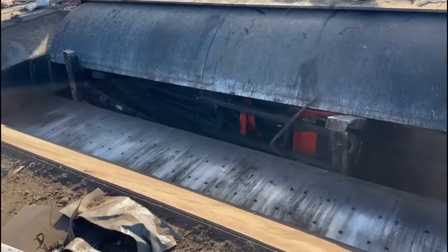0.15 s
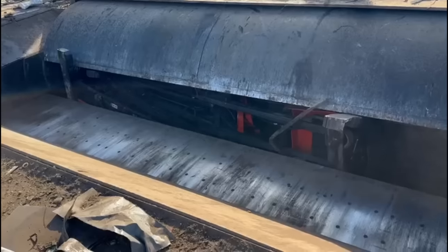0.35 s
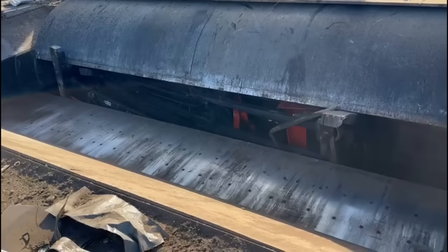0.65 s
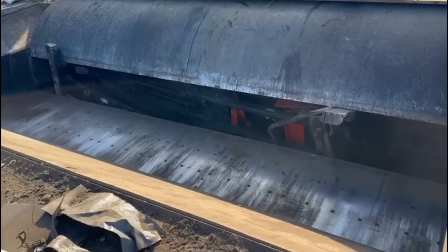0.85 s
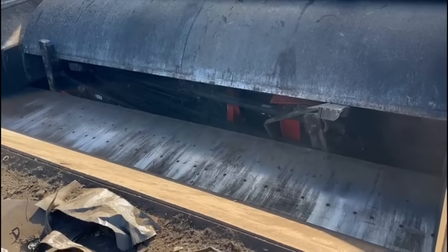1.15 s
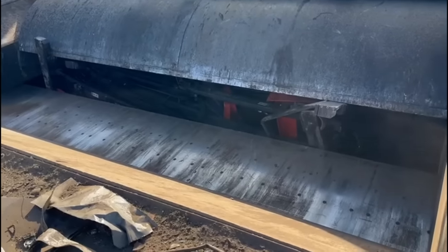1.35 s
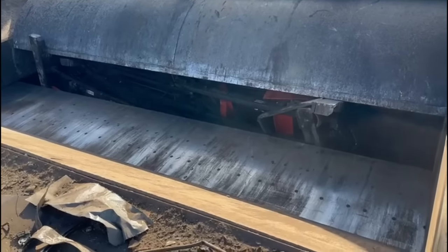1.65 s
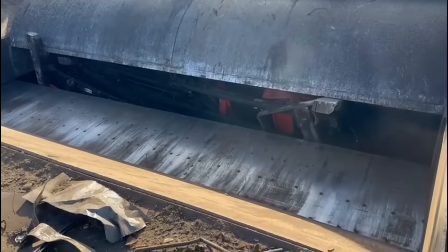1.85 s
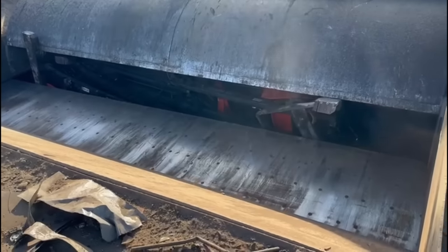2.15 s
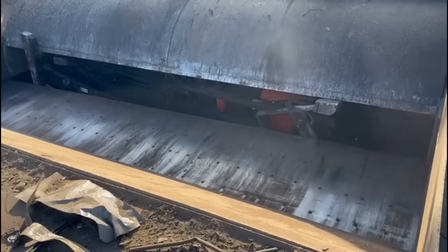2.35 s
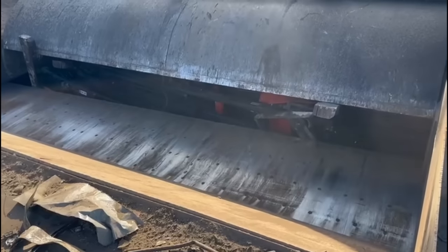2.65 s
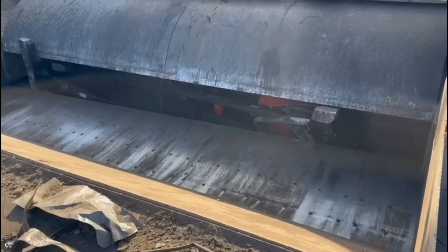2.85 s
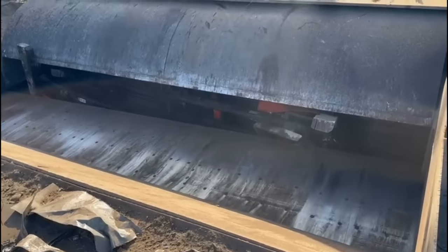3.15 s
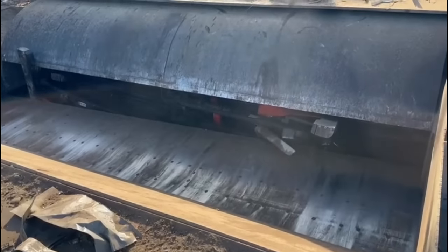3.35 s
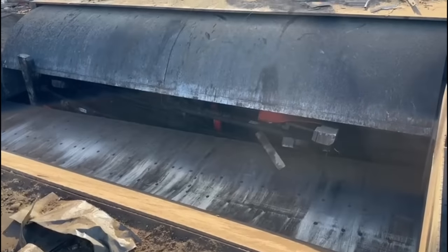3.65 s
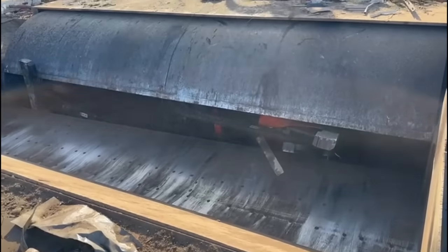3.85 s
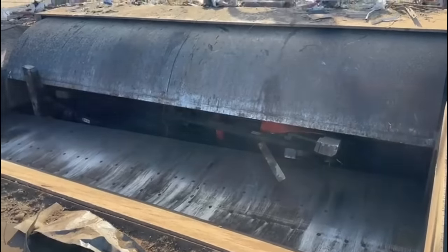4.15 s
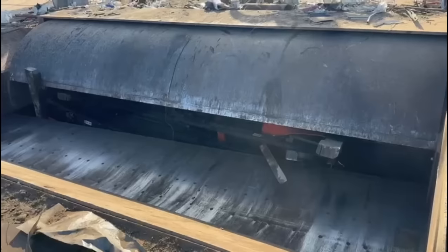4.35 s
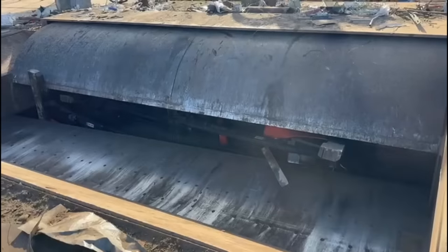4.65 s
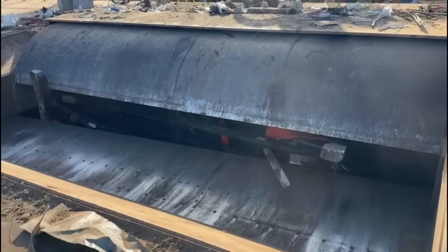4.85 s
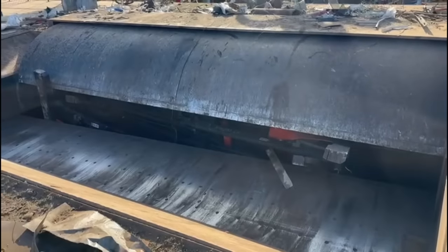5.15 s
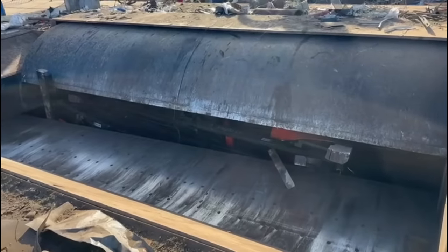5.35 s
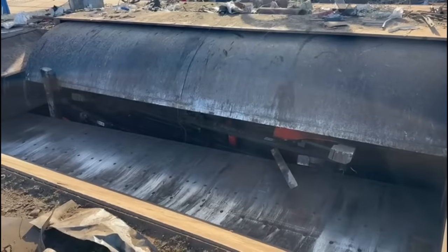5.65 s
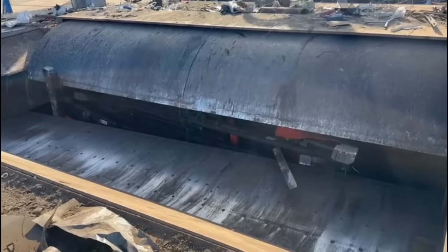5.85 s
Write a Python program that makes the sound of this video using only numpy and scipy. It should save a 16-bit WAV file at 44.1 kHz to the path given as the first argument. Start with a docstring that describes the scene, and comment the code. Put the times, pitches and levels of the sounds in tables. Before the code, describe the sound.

Close stereo capture of a steel lid folding onto a machine: gritty metal grinding with hard cracks and hollow panel booms for a second, a gap, a big buckle with wavering squeal, then a run of crackling snaps. A throbbing diesel pump remains behind, with a single clank and weak creaks before crushing resumes.

```python
"""Scrapyard, outdoors: a hydraulic baler folds its steel lid down on a forklift, before a two-port microphone.
The wreck grinds in bursts of tiny slips ringing through steel noise; parts snap as cracks with a noisy tail.
Panels buckle in short sagging swings; struck steel clanks and fragments ping as decaying modes.
Steel squeals on the press wall in bending tones; as the lid eases off, filtered slips creak.
Behind the wreck a diesel pump drones: steady tones over throbbing low noise."""
import sys
import numpy as np
from scipy import signal
from scipy.fft import rfft, irfft, next_fast_len
from scipy.io import wavfile
from scipy.ndimage import uniform_filter1d

SR = 44100
rng = np.random.default_rng(int(sys.argv[2]) if len(sys.argv) > 2 else 0)


def store_pcm(level_fs):
    """Save levels as 16-bit WAV."""
    pcm = np.round(np.clip(level_fs, -1, 1) * 32767).astype(np.int16)
    wavfile.write(sys.argv[1], SR, np.atleast_2d(pcm).T)


N = 264159
TIME = np.arange(N) / SR
SIZE = next_fast_len(N)
FREQS = np.maximum(np.arange(SIZE // 2 + 1) * SR / SIZE, 1)

# five registers of the wreck: frame, panels, brackets, tearing sheet, grit: low f/Hz, high f/Hz
REGISTERS = [(42, 130), (130, 600), (600, 1800), (1800, 4200), (4200, 12500)]
# decay of each register's ring: T60/s
RING_T60_S = [0.35, 0.43, 0.3, 0.22, 0.21]
# colour of the crushed steel: f/Hz, relative level per Hz/dB
STEEL_COLOUR = [(25, -41), (45, -14.5), (100, -0.5), (250, 1.5), (540, 1.5), (1080, -6), (1650, -7.5),
                (2400, -10.5), (4200, -23.5), (6200, -29), (8000, -24.5), (9800, -23.5), (10700, -38),
                (12000, -72.5)]
# resonances of the press chamber: f/Hz, width/Hz, lift/dB
CHAMBER = [(246, 77, 1.5), (466, 6, -1), (632, 55, -0.5), (640, 63, 1), (1314, 35, 4), (1690, 23, 4),
           (1800, 40, -0.5), (2370, 60, -2), (2870, 59, -1.5), (3540, 47, 3)]

# force of the lid, one curve a push: t/s, effort level/dB, brightness/dB per register
PUSHES = [
    [(0.0, -19, 1), (0.2, -28.5, -0.5), (0.33, -26.5, 1), (0.42, -23.5, -1), (0.57, -19, -0.5),
     (0.64, -18, -1.5), (0.68, -21, 1), (0.73, -17, -1), (0.83, -28, -3), (0.95, -25, 0), (1.09, -27, 0.7),
     (1.18, -43.5, -1), (1.5, -58.5, 2)],
    [(1.53, -43, 0), (1.56, -29.5, 1.5), (1.71, -24, -2), (1.88, -21.5, -0.5), (1.96, -23.5, -0.5),
     (2.17, -24.5, 1.7), (2.42, -30, -0.5), (2.62, -29.5, 0.3), (2.71, -21, -2.5), (2.83, -30, 1.6),
     (3.1, -24, 2), (3.4, -23.5, 0.5), (3.57, -23.5, 0.3), (3.68, -25, 1.3), (3.78, -47, -4.5),
     (3.95, -60, -4.5)],
    [(5.12, -68, -2), (5.29, -60, -3), (5.366, -53, -4.5), (5.48, -60, -4.5), (5.68, -65, -5)],
    [(5.74, -31, 1), (5.81, -21.5, -1.5), (5.89, -30.5, 1.5), (5.93, -28.5, 3.5), (5.99, -33, 0)],
]
# panels, brackets, sheet, grit at the usual effort: relative level/dB
GRIND_DB = [-0.5, -3, -6.5, -10.5]
# the same four, their rise with effort (a weak push is dull): slope/dB per dB
EFFORT_SLOPES = [0.849, 1.001, 1.17, 1.42]
# groan of the heavy frame while it still resists: t/s, level/dB
FRAME_GROAN = [(0.0, -27.5), (0.4, -31), (0.7, -26), (0.83, -34), (0.95, -28), (1.02, -35.5), (1.58, -45),
               (1.7, -33.5), (2.55, -39.5), (2.9, -35.5), (3.25, -41), (3.6, -39), (4.1, -58),
               (5.15, -65.5), (5.38, -42.5), (5.65, -50.5), (5.82, -33.5), (5.99, -47)]
# less crunch while the steel slides, panels to grit: reduction/dB
SLIDE_RELIEF_DB = [0.3, 1.3, 3.8, 2.5]
USUAL_EFFORT_DB = -22
STICK_DB, STICK_S = 2, 0.086   # depth and time constant of the jam before a part gives way
SLIDE_S, SLIDE_HALF_S = 2.06, .2   # middle and half length of the slide

# parts that snap: t/s, level/dB before the mix, brightness/dB per register, rise/s
SNAPS = [(0.054, -25.5, 1.5, .002), (0.117, -12.5, -2, 0.0029), (0.2333, -15.5, 2, .0003),
         (0.35, -18, -1, 0.00096), (0.380, -15.5, -2.5, 0.0015), (0.424, -23, -5, 0.0023),
         (0.494, -13.5, 0.5, .003), (0.530, -21, 1.5, .003), (0.569, -19, 0, .002), (0.588, -17, 0, 0.0032),
         (0.609, -16, 0.5, 0.0034), (0.646, -21, -2, .003), (0.689, -13.5, 3, 0.00091),
         (0.860, -32, 0, .001), (0.906, -19.5, 2, 0.0069), (0.971, -29.5, -0.5, 0.0016),
         (1.036, -28.5, -1, .002), (1.537, -30.5, -0.5, 0.0011), (1.559, -25, 2, 0.00082),
         (1.611, -30, 4, 0.0017), (1.805, -18.5, -4, 0.0037), (1.858, -22, 2, 0.0034),
         (2.322, -31, 1.5, 0.0017), (2.452, -31.5, 5, 0.0018), (2.498, -30.5, -1.5, .001),
         (2.579, -26.5, -0.8, .0005), (2.618, -31, 1.5, .001), (2.672, -21, 5, 0.004),
         (2.798, -27.5, 1.5, 0.0012), (2.884, -18.5, 0, 0.0011), (2.952, -28.5, 2, .001),
         (3.000, -19, 2.5, .003), (3.061, -19.5, 2.5, 0.0015), (3.082, -22, 1.5, .001),
         (3.113, -20, -0.5, 0.0008), (3.154, -24.5, 2.5, .001), (3.195, -24, 3, .001),
         (3.223, -23.5, 2.5, .001), (3.274, -19.5, 2, 0.0017), (3.318, -23, 2, .001),
         (3.376, -25.5, 1, 0.0009), (3.431, -14, 0.5, .002), (3.464, -20.5, -1, .001),
         (3.541, -19.5, 3, 0.0014), (3.602, -26.5, 2, .001), (3.622, -22.5, 4, 0.0022),
         (3.664, -28.5, 3, .002), (4.085, -55, 0.5, 0.0043), (4.3768, -17, 0, 0.0012),
         (4.863, -51, -1.5, .008), (5.030, -70, 10, .001), (5.352, -62, 6, .006),
         (5.73, -32.5, -0.5, 0.004), (5.8, -23.5, 2, 0.0017), (5.822, -23, -4, 0.0019),
         (5.924, -26, -1, 0.0017)]
# share of a snap, by register: relative level/dB
SNAP_SHARE_DB = [-19, -3, -.5, -2.5, -8.5]
# hard front of a snap, by register: relative level/dB
CRACK_DB = [-12, -12, -9, -4.5, -9]

# panels that buckle: t/s at the crest, peak level/dB before the mix, f/Hz at the crest
BUCKLES = [(0.041, -12, 247), (0.19, -20, 99), (0.320, -17.5, 91.5), (0.384, -9.5, 345),
           (0.394, -12.5, 88.5), (0.432, -6.5, 225), (0.636, -10.5, 111), (0.722, -10, 215),
           (0.727, -14, 123), (0.930, -14, 255), (1.812, -3, 430), (1.844, -9.5, 332), (1.862, -6, 295),
           (2.015, -10, 244), (2.661, -18.5, 131), (2.721, -8.5, 203), (3.095, -6, 740), (3.099, -7, 250),
           (3.450, -9, 289), (3.828, -19.5, 206), (3.868, -26, 207), (5.800, -15, 630), (5.806, 0.5, 780)]
BUCKLE_CYCLES = 2.2   # swings from the crest down to 1/e

# heavy parts knocking on the press wall: t/s, level/dB, f/Hz around which the blow rings most
CLANKS = [(0.122, -16.5, 1050), (0.376, -22, 1000), (0.2335, -14, 2950), (0.499, -13, 1500),
          (0.556, -19.5, 1400), (0.622, -17.5, 1200), (0.691, -24, 2100), (2.677, -20.5, 980),
          (2.799, -29, 2400), (2.886, -23, 840), (3.062, -22.5, 2500), (3.276, -26, 2700),
          (3.434, -18.5, 1350), (3.543, -24.5, 1400), (4.378, -20, 2200), (4.384, -24, 800),
          (5.804, -22.5, 1560), (5.926, -33, 2500)]
# modes of the knocked steel, before each blow's detuning: f/Hz, relative level/dB, T60/s
CLANK_MODES = [(530, -5, 0.15), (608, -1.5, .14), (735, -3, .11), (868, -4.5, 0.079), (1216, -7, 0.17),
               (1303, -4.5, .18), (1532, -3.5, 0.14), (1635, -1.5, 0.14), (1666, -5, 0.16),
               (1988, -5.5, .16), (2100, -6.5, 0.13), (2310, -6.5, .2), (2434, -5, 0.13), (2530, -9, .13),
               (2800, -5.5, 0.11), (3450, -11.5, 0.17), (3760, -13.5, .1), (4150, -13, 0.049),
               (4920, -12, .06), (5540, -14, .06)]
CLANK_OCTAVES = 1.1   # how far from its centre a blow still wakes the modes

# modes of a small fragment, before its own detuning: multiple of its pitch, relative level/dB
FRAGMENT_MODES = [(1, 0), (1.58, -4.5), (2.35, -7)]

# tones friction locks on to: f/Hz, relative level/dB, t/s at mid-grip, half length/s
SQUEALS = [(892, -32, 2.08, .19), (1310, -24, 1.88, 0.032), (1310, -33.5, 2.12, .18),
           (1450, -37, 2.2, 0.064), (1670, -24, 1.89, .057), (1684, -32.5, 2.05, 0.12),
           (1840, -27.5, 1.958, .1), (1880, -32, 2.16, 0.1), (2316, -31, 2.09, .13),
           (2400, -29.5, 1.885, .05), (2400, -36, 2.225, 0.042), (2530, -40.5, 2.15, 0.09),
           (2670, -39.5, 2.06, .19), (2805, -28.5, 1.9, 0.037), (2850, -40, 1.9, .06),
           (3070, -36.5, 2.125, .04), (3160, -43, 2.13, .14), (3242, -33, 1.9, .045),
           (3372, -40, 1.88, .05), (3768, -37.5, 1.89, .045), (3750, -47, 2.13, .14),
           (3995, -42, 1.89, .04), (4050, -39.5, 1.91, 0.046), (4040, -45.5, 2.07, 0.082),
           (4735, -45, 1.99, .07), (4878, -47.5, 1.89, .05), (5610, -51.5, 2.07, .19),
           (6000, -47.5, 1.99, 0.068), (6490, -55, 2.07, .19), (6745, -49.5, 2.08, .19),
           (7130, -53.5, 2.08, .1), (7505, -52.5, 2.0, .14)]
# squeal pitch following the contact pressure: t/s, bend/percent
SQUEAL_BEND = [(1.86, .4), (1.96, -0.44), (2.03, -0.22), (2.12, 0.1), (2.27, 1.43)]

# creaks as the lid eases off: t/s at the crest, level/dB, half length/s, f/Hz
CREAKS = [(4.89, -53, 0.032, 600), (5.207, -59, .03, 686), (5.255, -58.5, 0.041, 790),
          (5.345, -51, 0.05, 506), (5.39, -53.5, 0.06, 670), (5.47, -58, 0.07, 490),
          (5.59, -60, 0.045, 660)]

# colour of the pump's rumble, its tilt quartered for the walls' answer: f/Hz, relative level per Hz/dB
RUMBLE_COLOUR = [(25, -33), (45, 0), (86, 5), (160, 1), (250, -6.5), (450, -12), (600, -16), (2170, -25.5),
                 (3200, -34.5), (7000, -44), (9600, -35), (11500, -64.5)]
# tones of the diesel pump: f/Hz, rms level/dB around which they surge
PUMP_TONES = [(75.4, -63), (220.7, -58), (333.8, -66.5), (446.8, -67), (479.1, -69.5), (667.5, -71),
              (888.2, -74), (1093, -78), (1556, -76)]
RUMBLE_DB = -48   # level around which the rumble surges

# the two microphone ports: f/Hz, likeness of the two sides (0 to 1), phase/rad by which left leads
MIC_PORTS = [(150, .995, 0), (400, .982, .01), (850, .78, .1), (1450, .76, .65), (2300, .94, 0),
             (3200, .82, -.2), (4300, .93, -.05), (5300, .8, -.2), (6100, .9, -.05), (7100, .65, -1.5),
             (7800, .9, -3), (8600, .9, -2.9), (9400, .68, -1.2), (10400, .98, -.05)]
CUTOFF_HZ = 11400


def grinding(registers, levels, count=5):
    """Slips at several contact spots shake all registers at once; the push sets how loud each one is."""
    forces = [slips(per_s=210, spread_db=4.5, clump_db=4.5) for spot in range(count)]
    out = 0
    for modes, level, t60 in zip(registers, levels, RING_T60_S):
        crunch = sum(ring_out(force, modes, t60, direct_db=-3, direct_s=0.019) for force in forces)
        # the steady ram releases about the same energy from moment to moment
        energy = uniform_filter1d(np.mean(crunch ** 2, axis=0), size=SR // 14)
        out = out + crunch / np.sqrt(energy + 1e-12) * level
    return out


def push_level(order):
    """How hard a register is worked: own curve for the frame; the rest follow the lid and jam before snaps."""
    if order == 0:
        return from_db(np.interp(TIME, *np.transpose(FRAME_GROAN)))
    level = 0
    for push in PUSHES:
        s, effort_db, bright_db = np.transpose(push)
        db = USUAL_EFFORT_DB + GRIND_DB[order - 1]
        db = db + EFFORT_SLOPES[order - 1] * (effort_db - USUAL_EFFORT_DB)
        db = db + bright_db * (order - 2)
        # steep fades before and after the push, in dB per second
        outside_db = 1500 * np.maximum(s[0] - TIME, 0) + 300 * np.maximum(TIME - s[-1], 0)
        level = level + from_db(np.interp(TIME, s, db) - outside_db)
    snaps = np.append(np.sort(np.array(SNAPS)[:, 0]), np.inf)
    until_snap = snaps[np.searchsorted(snaps, TIME)] - TIME
    jam_db = STICK_DB * np.exp(-until_snap / STICK_S)
    relief_db = SLIDE_RELIEF_DB[order - 1] * grip(TIME, SLIDE_S, SLIDE_HALF_S)
    return level * from_db(-relief_db - jam_db)


def slips(per_s, spread_db, clump_db):
    """Tiny stick-slip releases of uneven size and either sign, at random moments, in loud and soft clumps."""
    sizes = from_db(spread_db * np.minimum(rng.exponential(1, N), 4)) * rng.choice([-1, 1], N)
    released = rng.random(N) < per_s / SR
    return sizes * released * from_db(clump_db * drift(55))


def snapping(registers, crack_s, clatter_db):
    """A part gives way: a hard crack, then every register clatters down, the low ones swelling later."""
    out = np.zeros((2, N))
    clatter = from_db(clatter_db * drift(160))
    for s, db, bright_db, rise in SNAPS:
        start = int(s * SR)
        t = TIME[:min(SR * 3 // 5, N - start)]
        span = slice(start, start + len(t))
        for k, ((low_hz, high_hz), modes, t60) in enumerate(zip(REGISTERS, registers, RING_T60_S)):
            crack = clatter[span] + from_db(CRACK_DB[k]) * np.exp(-t / crack_s)
            attack = crack * (1 - np.exp(-t / (rise + 1 / high_hz)))
            level = from_db(db + SNAP_SHARE_DB[k] + bright_db * (k - 2.5) - 60 * t / t60)
            place = rng.integers(N - SR)   # each part sounds its own mixture of modes
            out[:, span] += modes[:, place:place + len(t)] * attack * level
    return out


def buckling(wet_db, sag, rough, bend):
    """A panel swings a few cycles, pitch sagging as it yields; wide swings add overtones, the chamber answers."""
    out = np.zeros(N)
    wobble = rough * drift(250)
    for s, db, hz in BUCKLES:
        half = BUCKLE_CYCLES / hz
        near = np.abs(TIME - s) < 3 * half
        u = (TIME[near] - s) / half
        phase = 2 * np.pi * np.cumsum(hz * (1 - sag * u + wobble[near])) / SR
        swing = from_db(db) * np.exp(-u ** 2)
        overtones = bend * swing * (np.sin(2 * phase) + np.sin(3 * phase))
        out[near] += swing * (np.sin(phase) + overtones)
    walls = noise(from_db(at_hz(RUMBLE_COLOUR, FREQS) / 4) * (FREQS < 3000))
    return out + from_db(wet_db) * ring_out(out, walls, t60=0.29, direct_db=5.0, direct_s=.003)


def clanking(uneven_db, rebound_s, rebound_db, rise_s, detune):
    """A part strikes and rebounds twice, waking modes near the blow's pitch, detuned at random for each blow."""
    out = np.zeros((2, N + SR))
    t = TIME[:SR // 4]
    hz, mode_db, t60 = np.transpose(CLANK_MODES)
    decays = from_db(-60 * t / t60[:, None]) * (1 - np.exp(-t / rise_s))
    for s, db, centre_hz in CLANKS:
        detuned_hz = hz * (1 + detune * rng.standard_normal(len(hz)))
        rings = np.exp(2j * np.pi * detuned_hz[:, None] * t) * decays
        reach = np.exp(-(np.log2(hz / centre_hz) / CLANK_OCTAVES) ** 2)
        for k in range(3):
            start = int((s + k * rebound_s * (.5 + rng.random())) * SR)
            uneven = uneven_db * rng.standard_normal(len(hz))
            gains = reach * from_db(db + mode_db + k * rebound_db + uneven)
            # phases differ a little between the sides
            phases = 2 * np.pi * rng.random(len(hz)) + .5 * rng.standard_normal((2, len(hz)))
            out[:, start:start + len(t)] += ((gains * np.exp(1j * phases)) @ rings).imag
    return out[:, :N]


def pinging(load, count, level_db, spread_db, t60, low_hz, high_hz):
    """Small fragments twang free at random in a few inharmonic modes, as hard as the push works them."""
    out = np.zeros((2, N))
    t = TIME[:SR // 8]
    sides = np.array([[1], [-1]])
    ratios, mode_db = np.transpose(FRAGMENT_MODES)
    for when, pitch, size, lag, *shape in rng.random((count, 4 + len(FRAGMENT_MODES))):
        start = int(when * (N - len(t)))
        detune = 2 ** ((np.array(shape) - .5) / 2)   # up to a quarter octave either way
        hz = low_hz * (high_hz / low_hz) ** pitch * ratios * detune
        gains = load[start] * from_db(level_db + mode_db + at_hz(STEEL_COLOUR, hz) - spread_db * size)
        tone = gains @ np.exp(2j * np.pi * hz[:, None] * t) * np.exp(1j * (lag - .5) * sides)
        out[:, start:start + len(t)] += tone.imag * from_db(-60 * t / t60) * (1 - np.exp(-hz[0] * t))
    return out


def squealing(waver, jitter, flutter_db, rasp, level_db, mixing):
    """Friction locks on to mode after mode; tones bend with pressure, flutter, and rasp as contact chatters."""
    near = np.abs(TIME - SLIDE_S) < 2 * SLIDE_HALF_S
    out = np.zeros((2, N))
    tones = 0
    pressure = np.interp(TIME[near], *np.transpose(SQUEAL_BEND)) / 100 + waver * drift(22)[near]
    for hz, db, s, half in SQUEALS:
        phase = 2 * np.pi * np.cumsum(hz * (1 + pressure + jitter * drift(300)[near])) / SR
        swell = grip(TIME[near], s, half) * from_db(db + flutter_db * drift(70)[near])
        tones = tones + swell * np.sin(phase + rng.normal(0, 0.2, (2, 1)))
    tones = tones * (1 + rasp * drift(380)[near])
    # the contact is not linear, so the modes breed a crowd of sum tones
    high_pass = signal.butter(2, 1500, "high", fs=SR, output="sos")
    sum_tones = signal.sosfilt(high_pass, tones ** 2)
    out[:, near] = from_db(level_db) * (tones + mixing * sum_tones)
    return out


def grip(t, s, half):
    """A flat-topped swell around the time s, as the contact takes hold and lets go."""
    return np.exp(-np.minimum(((t - s) / half) ** 4, 30))


def creaking(sharpness, joint_hz, joint_db):
    """Slips of a relaxing joint ring in two broad modes: a groan pitched for each creak, and the joint's own."""
    out = np.zeros(N)
    force = slips(per_s=260, spread_db=2.5, clump_db=4.5)
    # the chamber dulls and smears the slips
    force = ring_out(force, steel_noise(350, 1500), t60=.2, direct_db=0, direct_s=.01)[0]
    for s, db, half, hz in CREAKS:
        near = np.abs(TIME - s) < 3 * half
        groan, joint = [rms_one(signal.lfilter(*signal.iirpeak(f, sharpness, fs=SR), force[near]))
                        for f in (hz, joint_hz)]
        swell = from_db(db) * np.exp(-((TIME[near] - s) / half) ** 2)
        out[near] += swell * (groan + from_db(joint_db) * joint)
    return out


def diesel_pump(waver, tones_db, throb, surge_db):
    """Firing and piston tones over an exhaust rumble that throbs with the crankshaft and surges unevenly."""
    turns = np.cumsum(1 + waver * drift(25)) / SR   # running time in s, slightly uneven
    tones = 0
    for hz, db in PUMP_TONES:
        level = from_db(db + surge_db * drift(8.2)) * np.sqrt(2)
        tones = tones + level * np.sin(2 * np.pi * (hz * turns + rng.random()))
    rumble = noise(from_db(at_hz(RUMBLE_COLOUR, FREQS)))
    rumble = rumble * (1 + throb * np.sin(2 * np.pi * 25 * turns))
    return from_db(tones_db) * tones + from_db(RUMBLE_DB + surge_db * drift(18)) * rumble


def ring_out(force, modes, t60, direct_db, direct_s):
    """A force on one spot of the steel: a short direct crack, then the chamber's dense tail; power is kept."""
    t = TIME[:SR // 4]
    place = rng.integers(N - SR)
    decay = from_db(-60 * t / t60) + from_db(direct_db) * np.exp(-t / direct_s)
    response = modes[:, place:place + len(t)] * decay
    response = response / np.sqrt(np.sum(response ** 2) / 2)
    return signal.fftconvolve(force[None].astype(np.float32), response.astype(np.float32), axes=1)[:, :N]


def steel_noise(low, high):
    """The crowded modes of wreck and chamber within one register, as coloured noise."""
    lift_db = sum(db / (1 + (2 * (FREQS - hz) / width) ** 2) for hz, width, db in CHAMBER)
    band = 1 / np.sqrt((1 + (low / FREQS) ** 10) * (1 + (FREQS / high) ** 10))
    return noise(band * from_db(at_hz(STEEL_COLOUR, FREQS) + lift_db))


def noise(gain):
    """Stereo noise of a given colour, as alike on both sides as the microphone ports hear it; rms 1."""
    mid, side = rfft(rng.standard_normal((2, SIZE)))
    alike = np.clip(at_hz(MIC_PORTS, FREQS), 0, .999)
    spectra = np.sqrt(1 + alike) * mid + np.sqrt(1 - alike) * side * [[1], [-1]]
    return rms_one(irfft(gain * spectra, SIZE)[:, :N])


def drift(rate):
    """Slow chance: straight lines between random knots of spread 1, rate knots a second."""
    knots = rng.standard_normal(4000)
    return np.interp(TIME * rate, np.arange(len(knots)), knots)


def at_hz(points, hz, order=1):
    """Read one column of a table on a log-frequency axis."""
    table = np.array(points)
    return np.interp(np.log(hz), np.log(table[:, 0]), table[:, order])


def rms_one(x):
    """Scale to an rms of 1."""
    return x / np.sqrt(np.mean(x ** 2) + 1e-20)


def from_db(db):
    """Decibels to amplitude gain."""
    return np.exp(np.asarray(db) * (np.log(10) / 20))


def scene():
    """The wreck in the press, with the pump behind it."""
    registers = [steel_noise(low, high) for low, high in REGISTERS]
    levels = [push_level(k) for k in range(len(REGISTERS))]
    wreck = grinding(registers, levels)
    wreck = wreck + from_db(-1.0) * snapping(registers, crack_s=0.0038, clatter_db=1.5)
    wreck = wreck + from_db(-4.5) * buckling(wet_db=-15.0, sag=0.028, rough=0.06, bend=0.32)
    wreck = wreck + clanking(uneven_db=2.0, rebound_s=.009, rebound_db=-6.5, rise_s=0.00058, detune=.018)
    load = np.hypot(levels[2], levels[3])   # brackets and sheet
    wreck = wreck + pinging(load, count=300, level_db=15, spread_db=13.5, t60=0.085,
                            low_hz=620.7, high_hz=3400)
    wreck = wreck + squealing(waver=.0015, jitter=.003, flutter_db=3.2, rasp=.38, level_db=1.2, mixing=.8)
    wreck = wreck + creaking(sharpness=9.6, joint_hz=1160, joint_db=-6)
    return wreck + diesel_pump(waver=0.00506, tones_db=0.0, throb=0.2, surge_db=1.4)


def record(dry):
    """The microphone: ports shift phase and level between the sides; peaks are rounded and the top is cut."""
    lead = at_hz(MIC_PORTS, FREQS, order=2)
    sides = np.array([[1], [-1]])
    heard = irfft(rfft(dry, SIZE) * np.exp(.5j * lead * sides), SIZE)[:, :N]
    heard = heard * from_db(.3 * sides)
    rounded = 1.3 * np.tanh(heard / 1.3)
    low_pass = signal.ellip(8, .05, 60, CUTOFF_HZ, fs=SR, output="sos")
    return signal.sosfiltfilt(low_pass, rounded)


dry = scene()
out = record(dry)
store_pcm(out)
```